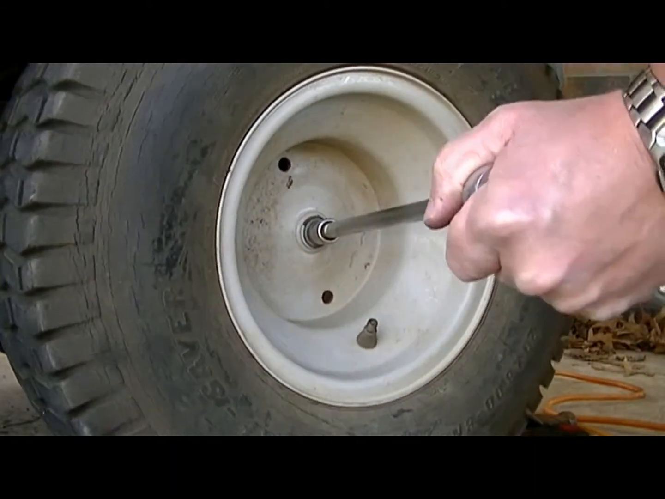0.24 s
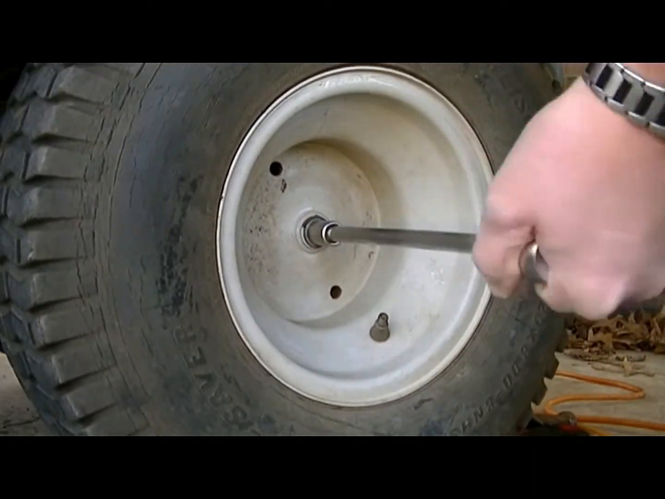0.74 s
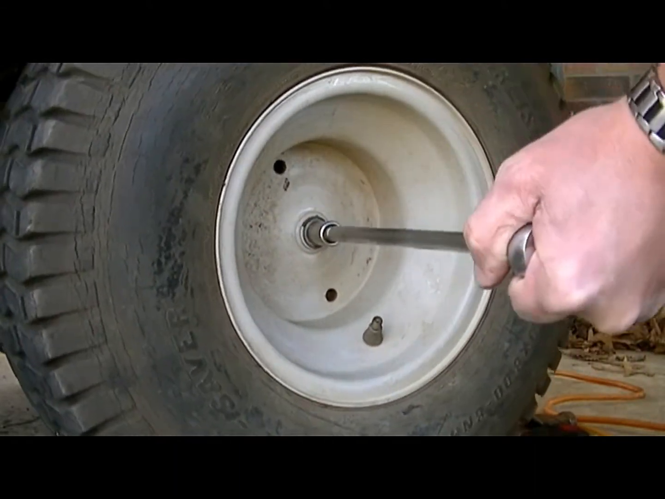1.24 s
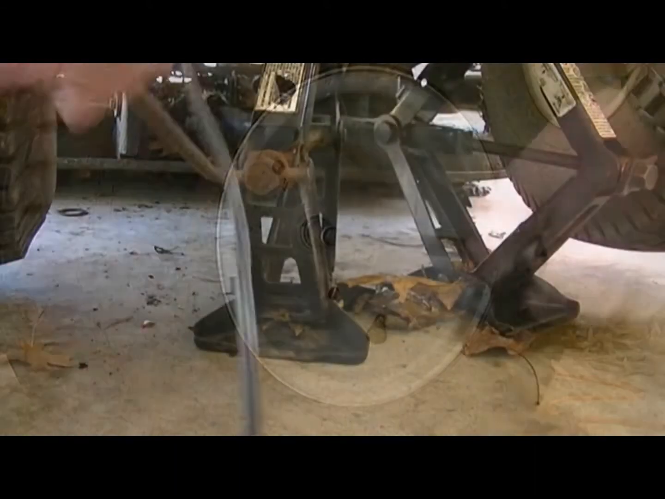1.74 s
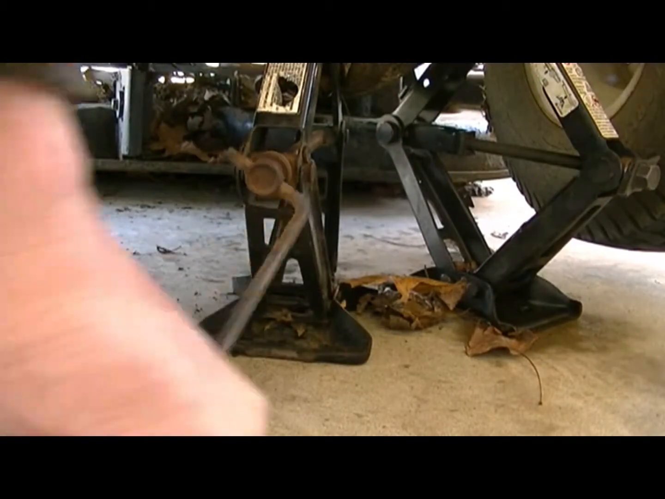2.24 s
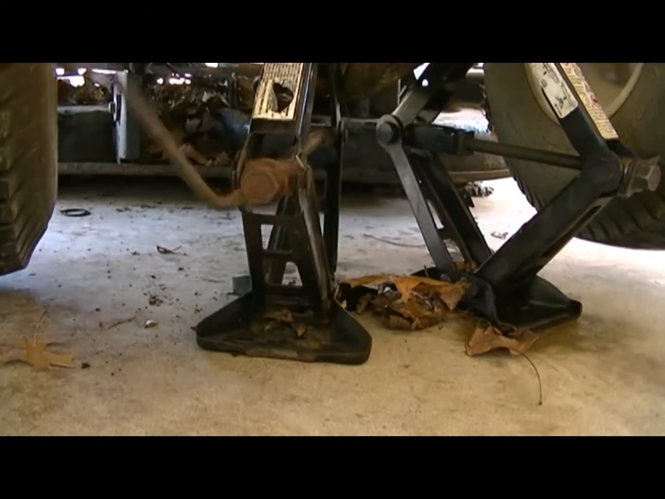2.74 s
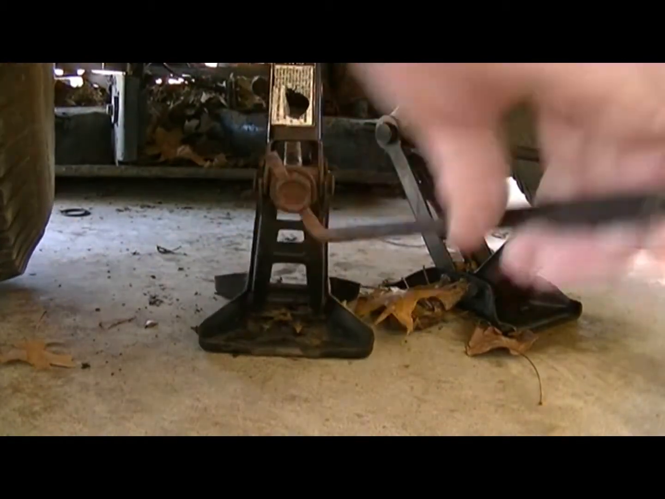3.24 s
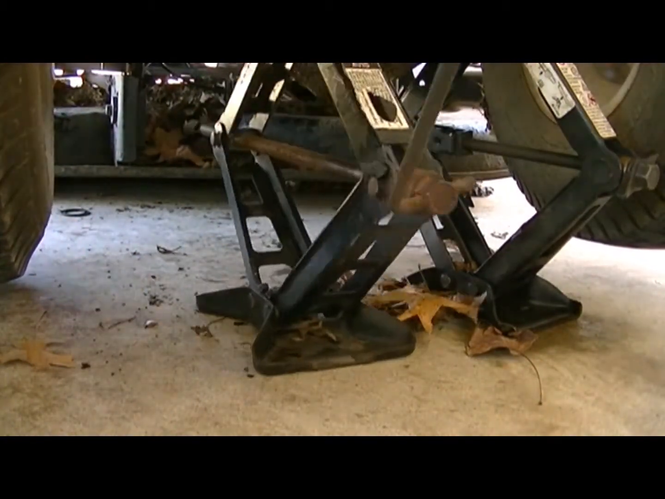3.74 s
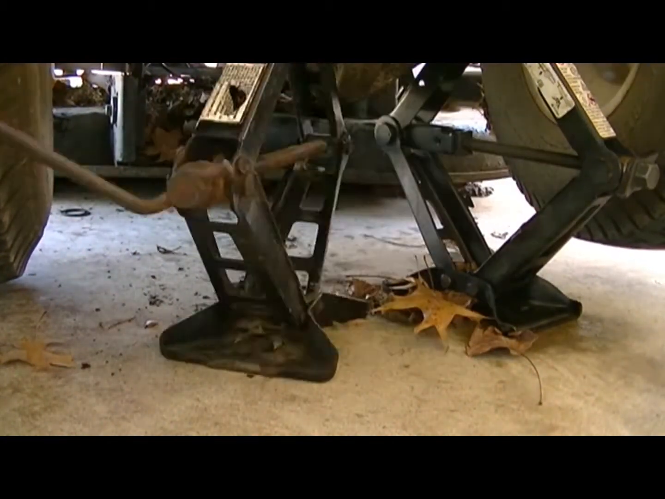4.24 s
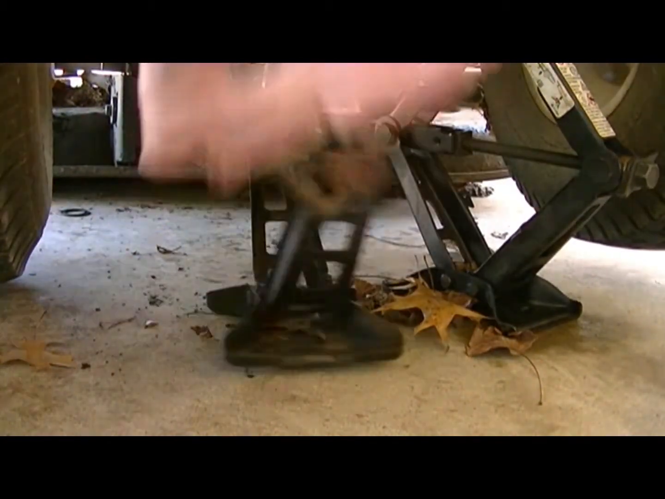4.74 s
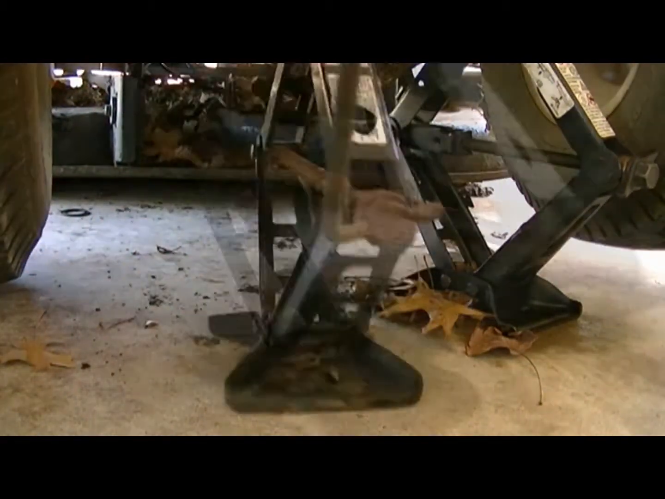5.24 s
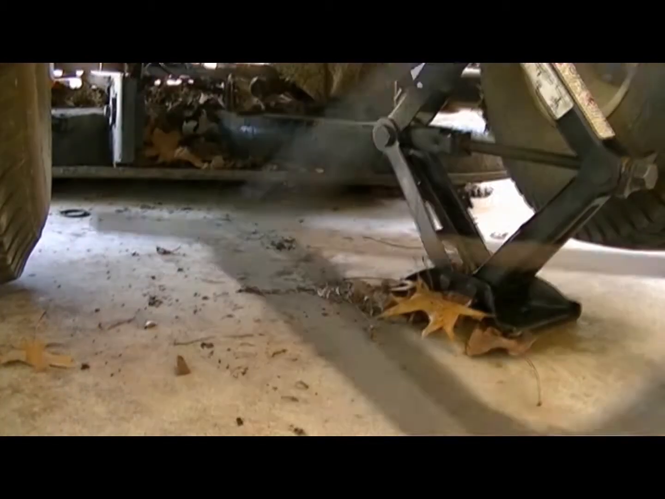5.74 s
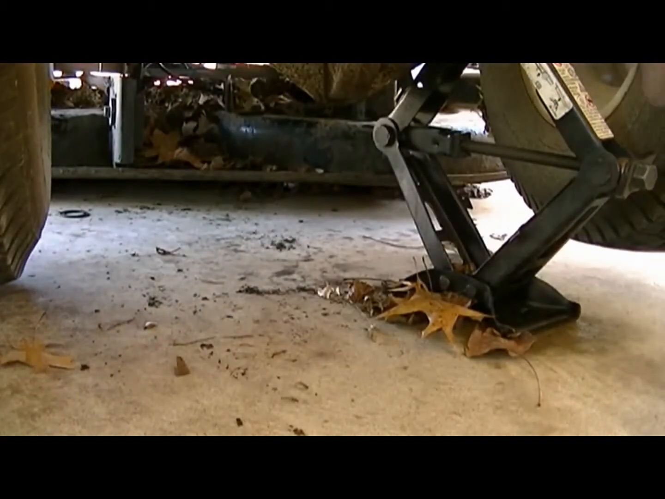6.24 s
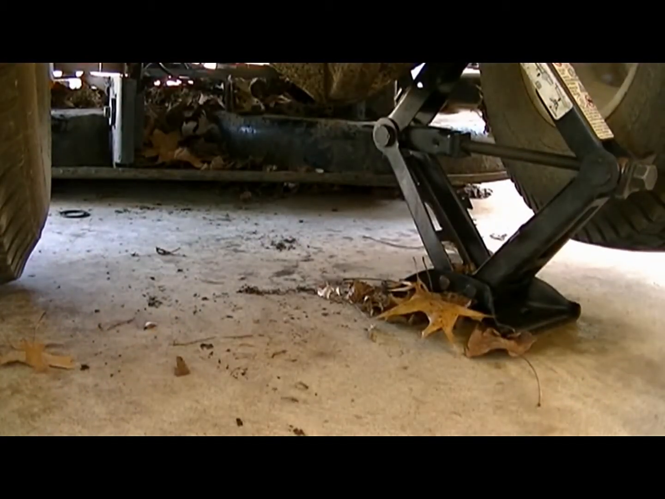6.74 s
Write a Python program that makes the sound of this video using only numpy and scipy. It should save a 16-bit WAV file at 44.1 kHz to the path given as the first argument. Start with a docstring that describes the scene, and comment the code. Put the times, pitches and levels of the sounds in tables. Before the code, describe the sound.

A steel scissor jack is cranked down with dry squeaks, clicks and thuds, then scrapes over concrete and clangs loudly.

```python
"""A steel scissor jack is cranked down on concrete in an open garage, over a soft rush and a low hum.
First a wrench shifts on a wheel nut, with clicks and dull jolts. After a brief silence near 1.6 s the
jack's dry screw sticks and slips, squeaking and rasping turn by turn, while its base rocks and thuds.
At 5.6 s the freed jack is dragged over the concrete, and from 6 s its loose arms and crank clang."""
import sys
import numpy as np
from scipy import signal
from scipy.fft import rfft, irfft, next_fast_len
from scipy.io import wavfile

SR = 44100
rng = np.random.default_rng(int(sys.argv[2]) if len(sys.argv) > 2 else 0)


def wav_record(signal):
    """Record a signal, one row per channel, as 16-bit PCM in the file named by sys.argv[1]."""
    frames = np.transpose(np.atleast_2d(signal))
    bounded = np.clip(frames, -1, 1)
    # unit amplitude maps onto the largest positive 16-bit level
    quanta = np.round(bounded * 32767).astype(np.int16)
    wavfile.write(sys.argv[1], SR, quanta)


N = 308429
TIME = np.arange(N) / SR


def from_db(db):
    """Turn decibels into a gain. Table levels are relative: each layer is scaled afterwards."""
    return 10 ** (np.asarray(db) / 20)


def level(rows):
    """Join rows of (seconds, dB) into a gain over time."""
    return from_db(np.interp(TIME, *np.transpose(rows)))


def coloured(x, colour, tilt_db=0, peak_hz=1000, peak_db=0, peak_octaves=.05):
    """Give x a tone colour and unit power. Tilt, in dB per octave, brightens it; a peak makes it sing."""
    size = next_fast_len(len(x))
    hz = np.maximum(np.arange(size // 2 + 1) * SR / size, 1)
    points, db = np.transpose(colour)
    gain = from_db(np.interp(np.log(hz), np.log(points), db)) * np.minimum(hz / points[0], 1) ** 2
    octaves = np.log2(hz / np.average(hz, weights=gain ** 2))
    resonance_db = peak_db / (1 + (np.log2(hz / peak_hz) / peak_octaves) ** 2)
    gain *= from_db(tilt_db * np.clip(octaves, -1, 2) + resonance_db)
    shaped = irfft(rfft(x, size) * gain, size)[:len(x)]
    return shaped / np.sqrt(np.mean(shaped ** 2) + 1e-20)


def drift(rate, size):
    """A wandering line that heads for a new random value `rate` times a second."""
    knots = rng.standard_normal(int(size / SR * rate) + 3)
    return np.interp(np.arange(size) * rate / SR, np.arange(len(knots)), knots)


def add(out, start_s, sound):
    """Mix a sound in from a given time."""
    i = round(start_s * SR)
    part = sound[max(-i, 0):N - i]
    out[max(i, 0):max(i, 0) + len(part)] += part


def shower(size, slips_per_s, spread_db=2.6, judder_db=2, judder_hz=300):
    """Rough surfaces move in tiny slips of uneven strength, bunched by judder."""
    slips = (rng.random(size) < slips_per_s / SR) * rng.choice([-1, 1], size)
    strength_db = spread_db * np.minimum(rng.exponential(1, size), 3)
    return slips * from_db(strength_db + judder_db * drift(judder_hz, size))


def friction(strokes, colour, swell_s, fade_s, sing_octaves, sing_db=5, easing=.03, size=12288, **grain):
    """Each stroke is a shower of slips that swells, holds and fades; easing makes long ones gentler."""
    out, t = np.zeros(N), (np.arange(size) - size // 4) / SR
    for start, length, db, tilt_db, hz in strokes:
        slips = coloured(shower(size, **grain), colour, tilt_db, hz, sing_db, sing_octaves)
        slack = np.maximum(-t / (swell_s + easing * length), (t - length) / (fade_s + easing * length))
        pressure = from_db(db - 10 * np.maximum(slack, 0) ** 1.15)
        add(out, start + t[0], pressure * slips)
    return out


def diffuse(x, ring_s, wet_db, top_hz, delay_s):
    """Add the dense ring of a frame or a room, which dies away by 60 dB in ring_s."""
    t = TIME[:SR // 2]
    tail = rng.standard_normal(len(t)) * from_db(-60 * t / ring_s) * (t > delay_s)
    tail = signal.sosfilt(signal.butter(1, top_hz, fs=SR, output="sos"), tail)
    return x + from_db(wet_db) * signal.oaconvolve(x, tail / np.linalg.norm(tail))[:N]


# How loud the background is by the wheel and by the jack. Each row: time in seconds, level in dB.
WHEEL_RUSH = [(0, -56), (.3, -55), (.6, -54), (1.572, -55), (1.58, -95), (7, -120)]
JACK_RUSH = [(0, -120), (1.598, -95), (1.612, -51), (2.4, -52), (3.4, -51.5), (4.6, -51), (5.6, -50),
             (6.6, -46.5), (7, -47)]
# The tone colour of each. Each row: frequency in Hz, level in dB.
WHEEL_RUSH_COLOUR = [(30, -29), (55, -22), (85, -4), (130, -5), (220, -9), (400, -8), (550, -12),
                     (800, -17), (1400, -21), (2500, -27), (5000, -32), (9000, -37), (12000, -43),
                     (15800, -50)]
JACK_RUSH_COLOUR = [(30, -32), (55, -27), (85, -6), (130, -12), (200, -10), (350, -12), (550, -15),
                    (800, -15), (1400, -20), (2500, -27), (5000, -34), (9000, -40), (12000, -47),
                    (15800, -56)]


def background_rush():
    """A low, soft rush by the wheel, then another by the jack; a brief silence near 1.6 s parts them."""
    by_wheel = level(WHEEL_RUSH) * coloured(rng.standard_normal(N), WHEEL_RUSH_COLOUR)
    by_jack = level(JACK_RUSH) * coloured(rng.standard_normal(N), JACK_RUSH_COLOUR)
    return by_wheel + by_jack


# How loud the hum is. Each row: time in seconds, level in dB.
HUM_LEVELS = [(0, -60), (1.57, -58), (1.6, -75), (1.63, -54), (1.9, -50), (2.3, -49), (2.45, -52), (4, -54),
              (5, -51.5)]
# The tones in the hum. Each row: multiple of the pitch, level in dB.
HUM_TONES = [(1, 0), (2, -18), (3, -17), (4, -14), (5, -18)]


def hum(pitch_hz=90, waver_db=.6):
    """A low hum wavers like a distant engine."""
    phase = 2 * np.pi * pitch_hz * TIME + .25 * drift(9, N)
    tones = sum(from_db(db) * np.sin(k * phase + rng.uniform(0, 2 * np.pi)) for k, db in HUM_TONES)
    return level(HUM_LEVELS) * from_db(waver_db * drift(8, N)) * np.sqrt(2) * tones


# The clearest clicks of the loose joints. Each row: start in seconds, level in dB.
CLICKS = [(.2394, -32), (.3217, -20), (.3364, -23), (.3431, -20), (1.3653, -37), (1.4571, -42),
          (1.5489, -38), (1.7084, -31), (1.7908, -34), (1.8312, -24), (3.015, -26), (3.3687, -38),
          (3.7409, -14), (3.8202, -21), (4.157, -23), (4.346, -33), (4.4887, -30), (4.6798, -25),
          (4.7401, -26), (4.9526, -10), (5.1821, -24), (5.2135, -22), (5.5218, -22), (5.6221, -22),
          (6.4325, -24)]
# The tone colour of steel on steel. Each row: frequency in Hz, level in dB.
STEEL_COLOUR = [(250, -14), (600, -12), (1000, -9.5), (1500, -8), (2000, -6), (2600, -5), (3300, -7),
                (4300, -8), (5400, -8), (7000, -13), (9000, -17), (11000, -23), (13500, -28), (15800, -41)]


def joint_clicks(fade_s=.0028, ring_db=-30, faint_count=20, work_s=5.6, size=4096):
    """A loose joint snaps tight with a crack and a slight ring; fainter clicks fall at random."""
    out, t = np.zeros(N), TIME[:size]
    faint = [(work_s * when, -46 - 6 * weak) for when, weak in rng.random((faint_count, 2))]
    for start, db in CLICKS + faint:
        noise = rng.standard_normal(size)
        crack = coloured(noise, STEEL_COLOUR, tilt_db=-.9, peak_hz=2600, peak_db=2, peak_octaves=.1)
        crack *= from_db(-10 * t / fade_s)
        add(out, start, from_db(db) * (crack + from_db(ring_db) * crank_ring(t)))
    return from_db(-7.5) * out


# The tones of the struck crank. Each row: pitch in Hz, level in dB, seconds to fade by 60 dB.
CRANK_TONES = [(1987, -10, .15), (2740, -7, .17), (2982, -9, .18), (3385, -6, .2), (3710, -7, .2),
               (3953, -9, .17), (4447, -8, .15), (4700, 1, .13), (5426, -8, .15), (6175, -12, .18),
               (6740, 0, .12), (7985, -7, .17), (8113, -14, .22), (9776, -8, .15), (10930, -11, .13),
               (11700, -15, .15)]


def crank_ring(t):
    """A blow sets each tone of the crank ringing with a strength of its own."""
    return sum(from_db(db + rng.normal(0, 2) - 60 * t / ring_s)
               * np.sin(2 * np.pi * hz * t) * rng.choice([-1, 1]) for hz, db, ring_s in CRANK_TONES)


# Where the jack's frame resonates. Each row: frequency in Hz, width in Hz, level in dB.
FRAME_BANDS = [(2520, 180, -3), (4750, 260, -6), (5450, 300, -7.5), (8100, 200, -9), (8750, 300, -6)]


def through_frame(x):
    """The frame's broad resonances colour whatever rubs or clicks on it."""
    return x + sum(from_db(db) * signal.lfilter(*signal.iirpeak(hz, hz / width, fs=SR), x)
                   for hz, width, db in FRAME_BANDS)


# The wrench jolts the wheel. Each row: start in seconds, level in dB.
WHEEL_JOLTS = [(.289, -30.5), (.343, -35), (.364, -36), (.455, -47), (.675, -45), (.754, -43)]
# The tone colour of a dull thud. Each row: frequency in Hz, level in dB.
THUD_COLOUR = [(80, -18), (150, -7), (250, -1), (380, -1), (550, -6), (900, -12), (1500, -13), (3000, -30),
               (8000, -55), (16000, -80)]
THUD_GRAIN = dict(slips_per_s=4000, spread_db=2.2, judder_db=1.2, judder_hz=250)


def wheel_jolts(wheel_hz=390, tilt_db=.8):
    """The wrench shifts on its nut and the wheel answers with dull knocks."""
    jolts = [(start, 0, db, tilt_db, wheel_hz) for start, db in WHEEL_JOLTS]
    return friction(jolts, THUD_COLOUR, swell_s=.0025, fade_s=.011, sing_octaves=.3, sing_db=8,
                    **THUD_GRAIN)


# Dry steel rubs. Each row: start in seconds, length in seconds, level in dB, tilt in dB per octave.
RUB_STROKES = [(.323, .027, -36, 2.9), (1.681, .011, -36, 3.1), (1.82, .016, -43, 4.8), (1.96, .02, -55, 2),
               (2.36, .06, -55, 2.5), (2.485, .09, -55, 2.8), (2.962, .015, -46, 0),
               (3.165, .022, -44, 2.8), (3.21, .06, -56, 2), (3.495, .055, -33, -1), (3.609, .022, -42, -4),
               (3.725, .018, -43, 3.5), (3.82, .03, -33, -.5), (3.945, .01, -41, -1.5),
               (3.972, .044, -33.5, 2.5), (4.095, .025, -41.5, 2), (4.128, .097, -33.5, 1.8),
               (4.41, .033, -41, -4), (4.585, .04, -50, -4.5), (4.702, .016, -28.5, 2.9),
               (4.82, .008, -32, 2.5), (4.96, .03, -36, -4.2), (5.056, .021, -30, -4),
               (5.115, .018, -33, -.3), (5.183, .012, -33, -3), (5.213, .021, -29.5, 1),
               (5.245, .02, -34, -3.8), (5.322, .012, -30, 3.1), (5.35, .025, -37, -3.5),
               (5.468, .014, -37.5, 2.9), (5.665, .006, -22, -4)]


def steel_rubs(sing_hz=2480, bright_tilt_db=3):
    """Steel rasps on steel stroke by stroke; the brightest strokes sing an octave higher."""
    strokes = []
    for start, length, db, tilt_db in RUB_STROKES:
        hz = sing_hz * (2 if tilt_db > bright_tilt_db else 1) * rng.normal(1, .05)
        strokes.append((start, length, db, tilt_db, hz))
    return friction(strokes, STEEL_COLOUR, swell_s=.007, fade_s=.012, sing_octaves=.06, slips_per_s=5000)


# The jack rocks. Each row: start in seconds, thud level in dB, thud pitch in Hz, grinding level in dB.
ROCKS = [(1.645, -43, 340, -38), (1.851, -44, 500, -34), (3.019, -32, 220, -47), (3.646, -26, 260, -23),
         (3.746, -40, 220, -47), (4.162, -24.5, 260, -28), (4.2, -34, 490, -24), (4.525, -36, 250, -38),
         (4.715, -35, 340, -40), (4.745, -31, 340, -38), (4.953, -19.5, 250, -18), (5.524, -26, 330, -26),
         (5.783, -28, 470, -12)]


def base_thuds(thud_tilt_db=.3, settle_s=.03, settle_db=-19, settle_tilt_db=-3):
    """The base thuds as the load shifts, then settles with a softer, darker rumble."""
    thuds = [(start, 0, db, thud_tilt_db, hz) for start, db, hz, _ in ROCKS]
    rumbles = [(start + settle_s, 0, db + settle_db, settle_tilt_db, hz) for start, db, hz, _ in ROCKS]
    rocking = friction(thuds, THUD_COLOUR, swell_s=.006, fade_s=.016, sing_octaves=.25, **THUD_GRAIN)
    settling = friction(rumbles, THUD_COLOUR, swell_s=.015, fade_s=.04, sing_octaves=.25, **THUD_GRAIN)
    return rocking + settling


def joint_grinding(sing_hz=2400, tilt_db=-1.9):
    """The joints grind briefly whenever the jack rocks."""
    grinds = [(start, 0, db, tilt_db, sing_hz) for start, _, _, db in ROCKS]
    return friction(grinds, STEEL_COLOUR, swell_s=.009, fade_s=.011, sing_octaves=.1, slips_per_s=6000)


# The screw squeaks. Each row: loudest moment in seconds, pitch in Hz, glide in octaves per second,
# level in dB, seconds to fade by 8 dB, overtone level in dB, roughness from 0 to 1.
SCREW_SQUEAKS = [(1.732, 1604, -.5, -29, .013, -5, .15), (2.621, 1863, -.5, -19, .007, -6, .45),
                 (2.632, 1843, -.2, -4.5, .011, -16, .22), (2.665, 1835, 0, -33, .011, -20, .1),
                 (2.716, 1852, 0, -34, .01, -28, .05), (2.819, 2099, -2.5, -25, .011, -28, .1),
                 (2.848, 1935, -1, -21, .017, -5, .35), (2.904, 1716, -1.2, -15, .015, 3.5, .3),
                 (3.898, 1362, -.3, -38, .017, 12, .45), (4.065, 1335, 0, -50, .016, 10, .6),
                 (4.37, 2290, 0, -39, .011, -6, .5), (4.82, 2412, 0, -33, .014, -14, .5),
                 (5.36, 2342, .3, -29.5, .018, -14, .5)]
# The extra tones in a squeak. Each row: multiple of the pitch, level in dB.
SQUEAK_TONES = [(.5, -22), (1.5, -15), (2, -5), (2.5, -21), (3, -3), (4, -15), (5, -19), (6, -29), (7, -30),
                (8, -33)]


def screw_squeaks(waver=.03, rasp=.65, flutter_db=3.5, swell_share=.85, size=8192):
    """The dry screw sticks and slips at one pitch; pressed harder, it grows extra tones and rasp."""
    out, t = np.zeros(N), (np.arange(size) - size // 2) / SR
    for peak_s, hz, glide, db, fade_s, overtones_db, rough in SCREW_SQUEAKS:
        pitch = hz * 2 ** (glide * t) * (1 + waver * rough * drift(600, size))
        phase = 2 * np.pi * np.cumsum(pitch) / SR
        grip = from_db(-8 * (np.maximum(-t / swell_share, t) / fade_s) ** 1.6)
        extras = rasp * rough * coloured(rng.standard_normal(size), STEEL_COLOUR, tilt_db=1)
        shrill_tilt_db = .8 * max(overtones_db, 0)   # hard pressure favours the highest tones
        for k, tone_db in SQUEAK_TONES:
            slip = rng.uniform(0, 2 * np.pi) + 1.6 * rough * drift(450, size)
            strength = from_db(tone_db + shrill_tilt_db * np.log2(k / 3) + flutter_db * drift(250, size))
            extras += strength * np.sin(k * phase + slip)
        squeak = np.sin(phase) + from_db(overtones_db) * grip ** .5 * extras
        add(out, peak_s + t[0], from_db(db) * grip * squeak)
    return out


# How loud the spinning screw is. Each row: time in seconds, level in dB.
WHISPER_LEVELS = [(3.3, -80), (3.5, -57), (4.25, -61), (4.9, -56), (5.45, -56), (5.65, -80)]


def screw_whisper():
    """The spinning screw rubs faintly between strokes."""
    slips = shower(N, slips_per_s=6000, judder_db=3, judder_hz=25)
    return level(WHISPER_LEVELS) * coloured(slips, STEEL_COLOUR, tilt_db=.5)


# The foot's scrape. Each row: time in seconds, level in dB, treble in dB (used against its average).
DRAG_LEVELS = [(5.6, -55, -5), (5.624, -32, -3), (5.648, -40, -6), (5.66, -32, -14), (5.682, -20, -8),
               (5.8, -14, -4), (5.81, -13, -7), (5.856, -33, -9), (5.87, -27, -8), (5.926, -32, -9),
               (5.948, -45, -11), (6.0, -50, -18)]
# The note the dragged foot sings. Each row: time in seconds, pitch in Hz.
DRAG_NOTE = [(5.68, 2550), (5.74, 2250), (5.785, 2650), (5.81, 1650), (5.84, 2400), (5.9, 3200)]
# The tone colour of scraping. Each row: frequency in Hz, level in dB.
SCRAPE_COLOUR = [(100, -14), (250, -16), (600, -13), (1100, -9), (1700, -1), (2500, 0), (3400, -2),
                 (5200, -3), (7000, -8), (9000, -10), (12000, -21), (15800, -32)]
SCRAPE_GRAIN = dict(slips_per_s=7000, spread_db=2.8, judder_db=2, judder_hz=250)


def foot_drag(treble_hz=4500, sing_db=-2, sing_width_hz=400):
    """The foot scrapes over concrete, its loudness and brightness shifting, singing a wandering note."""
    times, db, treble_db = np.transpose(DRAG_LEVELS)
    loudness = from_db(np.interp(TIME, times, db, left=-120, right=-120) - 2.7)
    grit = coloured(shower(N, **SCRAPE_GRAIN), SCRAPE_COLOUR)
    treble = signal.sosfiltfilt(signal.butter(2, treble_hz, "high", fs=SR, output="sos"), grit)
    treble_gain = from_db(np.interp(TIME, times, treble_db - treble_db.mean()) - .8)
    pitch = np.interp(TIME, *np.transpose(DRAG_NOTE))
    # Keep a narrow band around the pitch: shift it down to 0 Hz, smooth it, shift it back.
    carrier = np.exp(2j * np.pi * np.cumsum(pitch) / SR)
    pole = np.exp(-np.pi * sing_width_hz / SR)
    singing = 2 * np.real(carrier * signal.lfilter([1 - pole], [1, -pole], grit / carrier))
    return loudness * (grit + from_db(sing_db) * singing + (treble_gain - 1) * treble)


# Loose steel parts collide. Each row: start in seconds, level in dB, seconds to fade by 10 dB,
# tilt in dB per octave, level of the crank's ring in dB.
ARM_HITS = [(6.0115, -1, .014, -1.8, -24), (6.0938, -.5, .022, 0, -24), (6.1235, -2, .024, 0, -24),
            (6.2015, 1, .021, -.3, -24), (6.2705, -15, .016, 0, -24), (6.3135, -7.5, .015, 1.9, -14),
            (6.4375, -22, .011, 2.2, -10), (6.488, -34, .016, 2, -13)]
# The tone colour of a crash. Each row: frequency in Hz, level in dB.
CRASH_COLOUR = [(50, -28), (120, -23), (270, -17), (500, -17), (900, -6), (1250, -9), (1800, -4),
                (2700, -1), (3800, 0), (5200, -2), (7000, -5), (9500, -11), (12500, -20), (15800, -31)]


def arm_clangs(chatter_db=1.5, chatter_hz=400, size=16384):
    """The pressed-steel arms crash and chatter briefly; the crank rings on."""
    out, t = np.zeros(N), TIME[:size]
    for start, db, fade_s, tilt_db, ring_db in ARM_HITS:
        crash = coloured(rng.standard_normal(size), CRASH_COLOUR, tilt_db)
        crash *= from_db(chatter_db * drift(chatter_hz, size) - 10 * t / fade_s)
        add(out, start, from_db(db) * (crash + from_db(ring_db) * crank_ring(t)))
    return out


# One slide: start in seconds, length in seconds, level in dB, tilt in dB per octave, pitch in Hz.
SLIDE_STROKE = (6.08, .21, -28, .5, 2400)


def arm_slide():
    """The loose arms scrape over each other between clangs."""
    return friction([SLIDE_STROKE], SCRAPE_COLOUR, swell_s=.02, fade_s=.02, sing_octaves=.13,
                    easing=0, size=24576, **SCRAPE_GRAIN)


def scene():
    """Rubbing and dragging ring in the jack's frame; the garage echoes the work, over rush and hum."""
    rubbing = from_db(-3.8) * (steel_rubs() + joint_grinding() + screw_whisper())
    scraping = through_frame(rubbing) + foot_drag() + arm_slide()
    frame = diffuse(scraping, ring_s=.035, wet_db=-6, top_hz=12000, delay_s=.0003)
    thuds = from_db(1.3) * (wheel_jolts() + base_thuds())
    work = frame + thuds + screw_squeaks() + through_frame(joint_clicks()) + arm_clangs()
    garage = diffuse(work, ring_s=.26, wet_db=-28, top_hz=3500, delay_s=.006)
    return (garage + background_rush() + hum())[None]


def record(dry, ceiling=.64, cutoff_hz=16100):
    """The loudest peaks overload and are rounded off; the highest treble is cut."""
    squashed = dry / (1 + (dry / ceiling) ** 6) ** (1 / 6)
    return signal.oaconvolve(squashed, signal.firwin(255, cutoff_hz, fs=SR)[None], "same")


dry = scene()
out = record(dry)
wav_record(out)
```